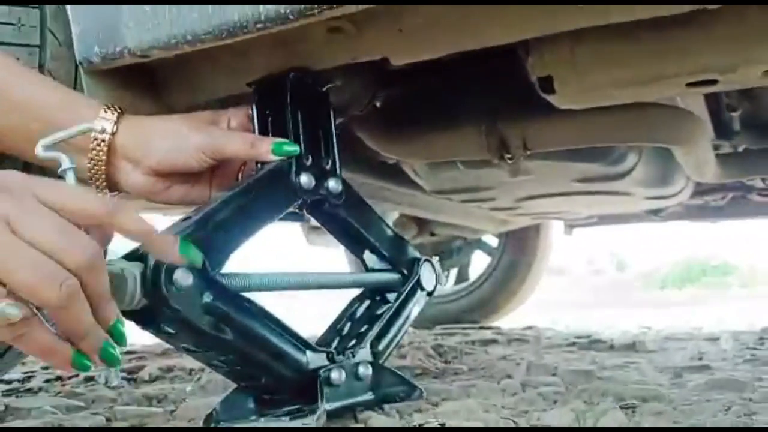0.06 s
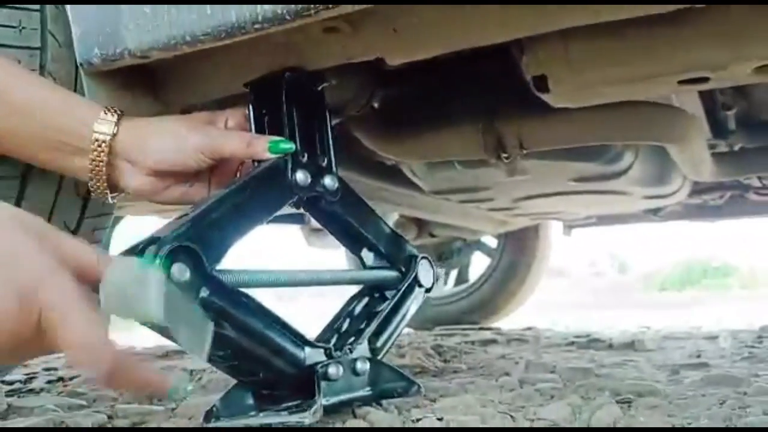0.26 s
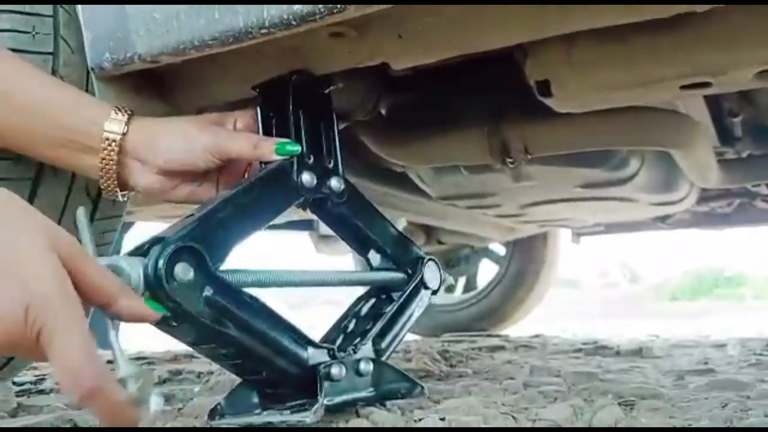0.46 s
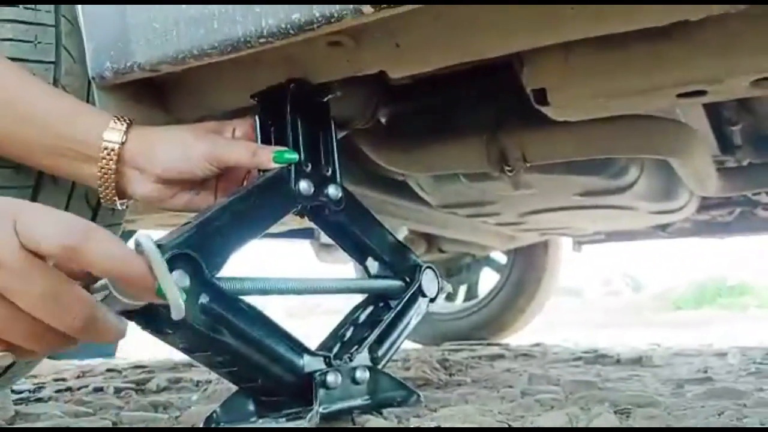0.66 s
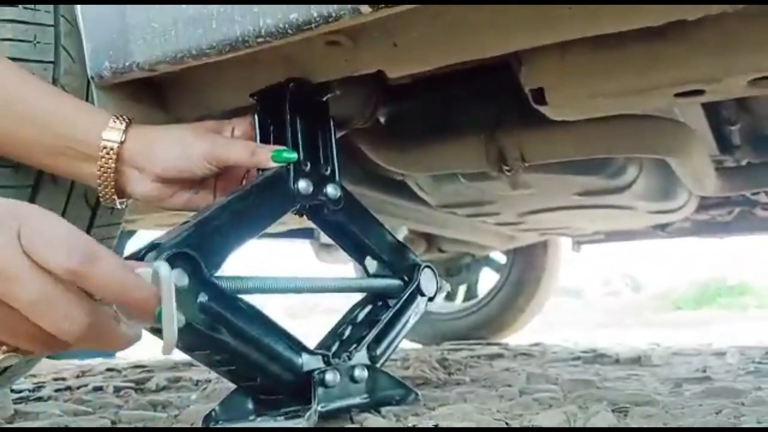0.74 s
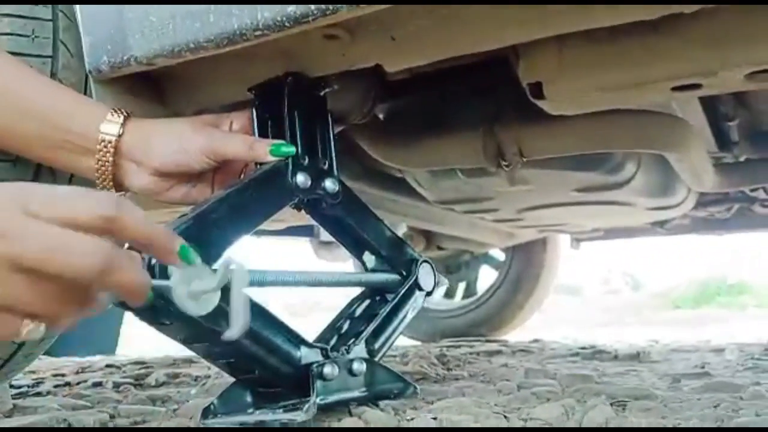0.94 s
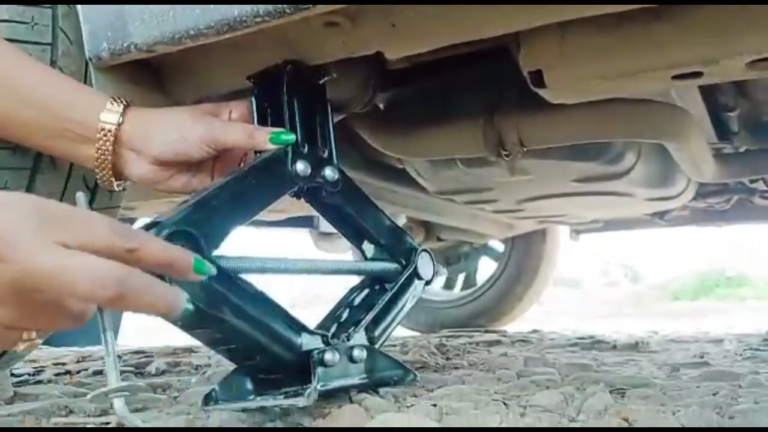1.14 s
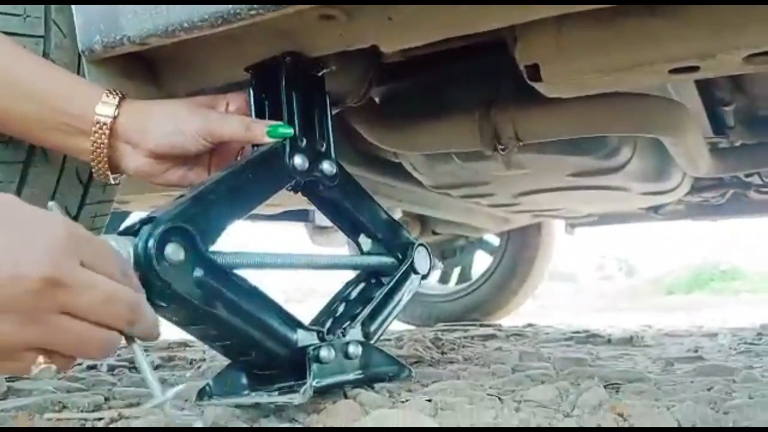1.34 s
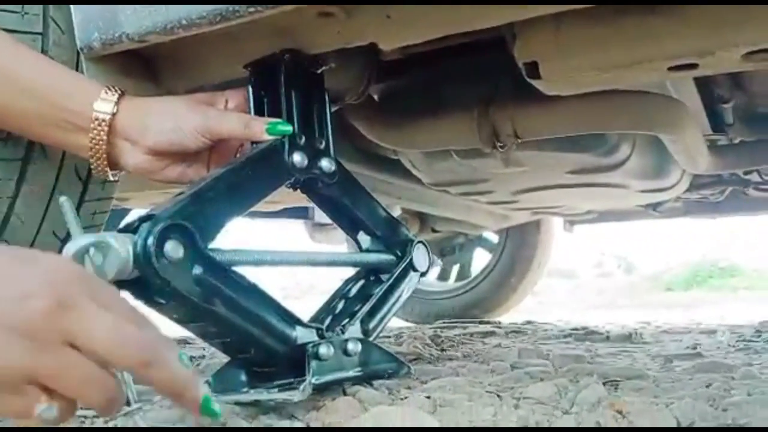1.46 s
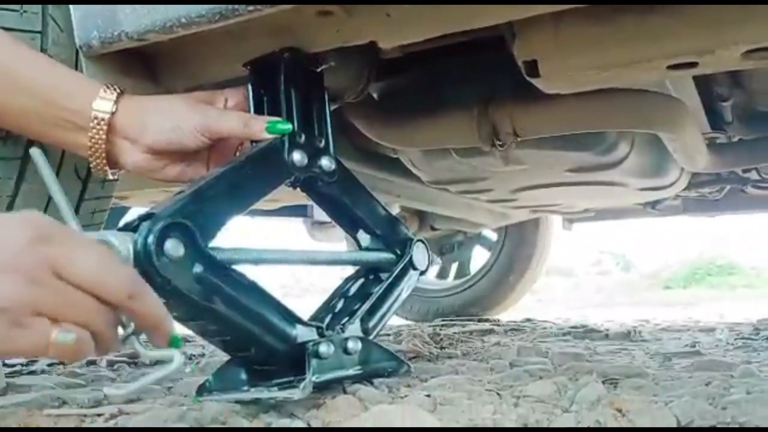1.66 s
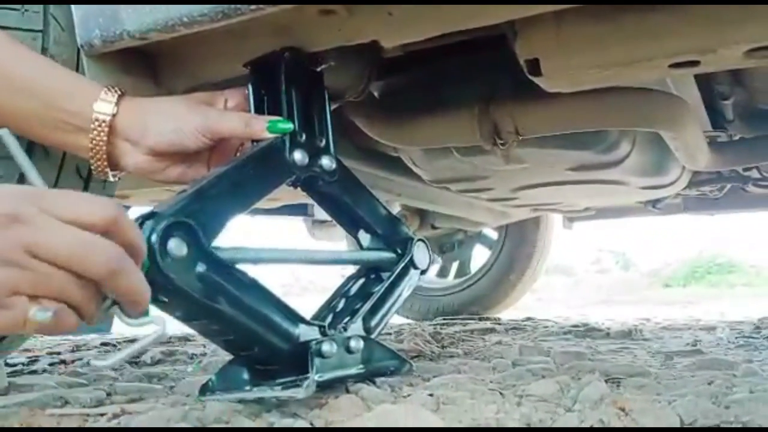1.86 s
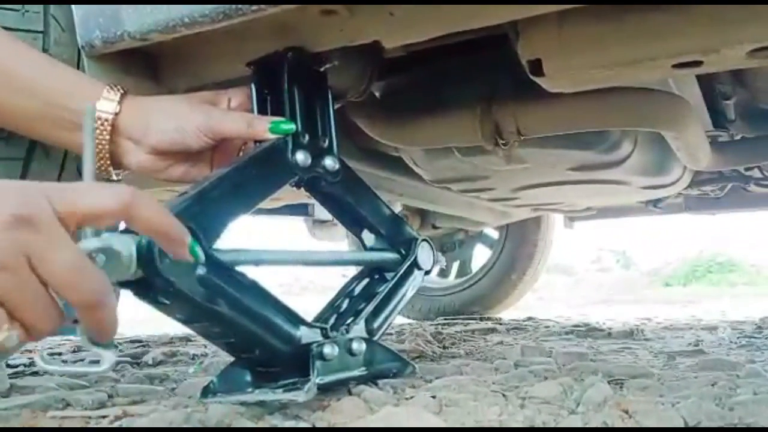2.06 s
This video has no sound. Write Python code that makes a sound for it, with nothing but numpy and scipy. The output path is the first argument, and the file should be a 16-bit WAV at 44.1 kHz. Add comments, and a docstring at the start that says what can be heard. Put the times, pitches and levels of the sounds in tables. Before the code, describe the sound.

Close metal clinks and scrapes from a hand winding a scissor jack under a car.

```python
"""Winding a scissor jack

Outdoors, close to the microphone, a hand winds the loose steel crank of a scissor jack under a car.
On each turn the crank knocks and scrapes in the eye of the screw and the pressed-steel frame clanks.
The load settles with snaps and a groan; the rod squeaks and rings thinly until the fingers damp it.
Some way off an engine idles, over low rumble, thin hiss and a faint whine."""
import sys
import numpy as np
from scipy import signal
from scipy.fft import rfft, irfft
from scipy.io import wavfile

SR = 44100
rng = np.random.default_rng(int(sys.argv[2]) if len(sys.argv) > 2 else 0)


def materialize(psi):
    """Save the field psi as 16-bit PCM at rate SR to the path in sys.argv[1].

    A 1-D psi becomes a single channel; in a 2-D psi each row is a channel.
    """
    bounded = np.clip(np.atleast_2d(psi).T, -1, 1)
    quanta = np.round(bounded * 32767).astype(np.int16)
    wavfile.write(sys.argv[1], SR, quanta)


N = 92610
TIME = np.arange(N) / SR


def from_db(db):
    """Decibels to gain."""
    return 10 ** (np.asarray(db) / 20)


def unit_rms(x):
    """Scale to unit power."""
    return x / np.sqrt(np.mean(x ** 2) + 1e-20)


def fade(t, t60):
    """Exponential decay from t = 0, flat before."""
    return np.exp(-np.log(1000) * np.maximum(t, 0) / t60)


def butter(x, hz, kind, order=2):
    """Causal low- or high-pass."""
    return signal.sosfilt(signal.butter(order, hz, kind, fs=SR, output="sos"), x)


def colour(x, hz, db):
    """Shape a spectrum with a curve drawn on a log-frequency axis."""
    f = np.maximum(np.fft.rfftfreq(x.shape[-1], 1 / SR), 1)
    return irfft(rfft(x) * from_db(np.interp(np.log(f), np.log(hz), db)), x.shape[-1])


def drift(hz):
    """Slow random wander of unit power."""
    return unit_rms(butter(rng.standard_normal(N + SR), hz, "low")[SR:])


def pan(db):
    """Left and right gains, db being left minus right."""
    return from_db(np.array([[db], [-db]]) / 2)


def add(out, start, x):
    """Mix a sound in at a time in seconds."""
    i = int(start * SR)
    out[:, i:i + x.shape[-1]] += x[:, :N - i]


# Spectrum of the open air around the microphone: f/Hz, relative level/dB
AIR_SPECTRUM = [(15, -22.5), (25, -3), (95, -1), (621, -24), (769, -29), (1280, -30.5), (4150, -32),
                (6200, -45.5), (15000, -43.5)]
# Background hiss dips during the loud clanks and comes back at the end,
# as with a recorder's gain control: t/s, gain/dB
HISS_GAIN = [(.1, 4.5), (.55, -1.5), (2.02, 2.5)]


def open_air(level_db=-47, split_hz=894, side_db=-8.5):
    """Steady low rumble and a thin background hiss, wider in the treble."""
    mid, side = colour(rng.standard_normal((2, N)), *np.transpose(AIR_SPECTRUM))
    side = from_db(side_db) * side + 0.6 * butter(side, split_hz, "high", order=1)
    air = from_db(level_db) * unit_rms(np.array([mid + side, mid - side]))
    rumble = butter(air, split_hz, "low", order=1)
    hiss = (air - rumble) * from_db(np.interp(TIME, *np.transpose(HISS_GAIN)))
    return rumble + hiss


# A faint whine in the far distance: t/s, f/Hz, level/dB
WHINE_PATH = [(1.68, 804, -76), (1.849, 798, -58.5), (2.1, 765, -57.5)]


def distant_whine(width_hz=28):
    """A narrow band of noise comes in late and sinks a little in pitch."""
    times, hz, db = np.transpose(WHINE_PATH)
    phase = 2 * np.pi * np.cumsum(np.interp(TIME, times, hz)) / SR
    band = drift(width_hz) * np.sin(phase) + drift(width_hz) * np.cos(phase)
    return band * from_db(np.interp(TIME, times, db)) * (TIME > times[0])


# The engine some way off, centre: t/s, level of the lowest two hum lines/dB, of the upper lines/dB
IDLE_LEVELS = [(0, -35, -41.5), (.35, -46, -48.5), (.8, -38, -38), (1.15, -37.5, -36.5), (1.4, -48, -52),
               (2.1, -71, -47.5)]
# Its hum lines: f/Hz, relative level/dB
HUM_LINES = [(67.7, -7.5), (101.7, -7), (135.3, -5.5), (203.5, -11)]


def idling_engine(gain_db=-5, waver_db=2.5):
    """Multiples of the crankshaft rate hum, each wavering in level and phase."""
    times, low_db, upper_db = np.transpose(IDLE_LEVELS)
    hum = np.zeros(N)
    for k, (hz, db) in enumerate(HUM_LINES):
        level_db = db + gain_db + np.interp(TIME, times, low_db if k < 2 else upper_db)
        level_db += waver_db * drift(hz=7.8)
        phase = 2 * np.pi * (hz * TIME + rng.random()) + 0.78 * drift(hz=4.7)
        hum += from_db(level_db) * np.sin(phase)
    return np.sqrt(2) * hum


def joint_groan(start_s=0.6796, length_s=0.031, start_hz=814, rise_hz_per_s=3550, level_db=-30):
    """A joint of the jack gives one short rising creak under load."""
    out = np.zeros((2, N))
    t = TIME[:int(length_s * SR)]
    swell = np.sin(np.pi * t / length_s)
    glide = np.sin(2 * np.pi * (start_hz + rise_hz_per_s * t / 2) * t)
    add(out, start_s, from_db(level_db) * pan(0) * swell * glide)
    return out


# Snaps close by, right of the microphone: t/s, level/dB, t60/s
LOAD_SNAPS = [(0.2328, -13, 0.046), (0.2731, -26, 0.0074), (0.307, -42.5, .05)]
# Their spectrum: f/Hz, relative level/dB
SNAP_SPECTRUM = [(250, -20.5), (1300, -11.5), (2500, 1), (13000, -21.5)]


def load_snaps(pan_db=-12):
    """The load settles with dry cracks that die at once."""
    out = np.zeros((2, N))
    for start, db, t60 in LOAD_SNAPS:
        crack = unit_rms(colour(rng.standard_normal(N), *np.transpose(SNAP_SPECTRUM)))
        add(out, start, from_db(db) * pan(pan_db) * crack * fade(TIME, t60))
    return out


# The rod rubbing, close and to the left: t/s, length/s, f/Hz, relative level/dB
ROD_SQUEAKS = [(.233, .023, 11425, -14), (.241, .015, 11635, -29), (.241, .015, 7530, -35),
               (.415, .03, 12070, -34), (.434, .012, 11010, -20), (.435, .018, 8030, -34),
               (.83, .025, 8030, -37), (1.183, .035, 12070, -34), (1.2, .018, 7770, -33)]


def rod_squeaks(gain_db=-1.5, pan_db=6.5, rise_s=0.001, t60_s=0.054):
    """Friction locks on one mode of the rod, holds it briefly and lets it die."""
    out = np.zeros((2, N))
    for start, length, hz, db in ROD_SQUEAKS:
        envelope = np.minimum(TIME / rise_s, 1) * fade(TIME - length, t60_s)
        add(out, start, from_db(db + gain_db) * pan(pan_db) * envelope * np.sin(2 * np.pi * hz * TIME))
    return out


# Modes of the steel rod: f/Hz, relative level/dB, t60/s
ROD_MODES = [(7750, -17, .6), (11438, -3, .55), (11646, 0, .75), (12352, -14, .7)]
# Its free rings, close and well to the left: start t/s, damped at t/s, level/dB
ROD_RINGS = [(0.431, 0.681, -33.5), (1.189, 1.415, -35.5)]


def rod_rings(shimmer_db=2.5, shimmer_hz=14, damped_t60_s=0.019, pan_db=11.5):
    """The rod rings until the fingers stop it; as the crank turns, each mode wavers on its own."""
    ring = np.zeros(N)
    for hz, db, t60 in ROD_MODES:
        envelope = from_db(db + shimmer_db * drift(shimmer_hz)) * fade(TIME, t60)
        ring += envelope * np.sin(2 * np.pi * hz * TIME)
    out = np.zeros((2, N))
    for start, damped_at, db in ROD_RINGS:
        fingers = fade(TIME - (damped_at - start), damped_t60_s)
        add(out, start, from_db(db) * pan(pan_db) * ring * fingers)
    return out


# The crank's place in front of the microphone: t/s, left minus right level/dB
CRANK_BALANCE = [(.24, 2), (.39, 0)]


def crank_pan(at_s):
    """Left and right gains of a contact: slightly left at first, then centre."""
    return pan(np.interp(at_s, *np.transpose(CRANK_BALANCE)))


CONTACT_RISE_S = 0.0049
# Clunks of the loaded jack, close up: t/s, f/Hz, level/dB, t60/s
JACK_CLUNKS = [(.438, 2750, -24, .08), (.528, 1480, -31, .09), (1.62, 2890, -11, .06),
               (1.815, 2845, -7, .04), (1.813, 2520, -12, .035)]


def jack_clunks():
    """Each hard shift of the load rings a single mode of the jack."""
    out = np.zeros((2, N))
    for start, hz, db, t60 in JACK_CLUNKS:
        envelope = (1 - fade(TIME, CONTACT_RISE_S)) * fade(TIME, t60)
        add(out, start, from_db(db) * crank_pan(start) * envelope * np.sin(2 * np.pi * hz * TIME))
    return out


FRAME_T60_S, TREBLE_HZ, STEREO_CORRELATION = 0.045, 4910, 0.62
CRACK_DB, CRACK_T60_S = -1, 0.0061
UNDERBODY_DB, UNDERBODY_T60_S = -32, 0.24
# Crowded modes of the pressed-steel frame at the microphone: f/Hz, left level/dB, right level/dB
FRAME_SPECTRUM = [(612.5, -42, -35.5), (832, -12, -10.5), (1138, -14.5, -10), (1474, -7, 2), (2350, -1, 4),
                  (3020, -1, 0.5), (3210, -7.5, -14.5), (4870, -12.5, -8), (6200, -6.5, -24.5),
                  (7300, -14, -30), (7800, -7.5, -26.5), (9220, -20.5, -35), (9190, -13.5, -24.5),
                  (11900, -18, -26), (14470, -32, -58.5), (15440, -57, -78)]
# Its clearest modes, a little to the right: f/Hz, relative level/dB, t60/s
CLEAR_MODES = [(520, -20, .08), (1440, -15, .13), (1580, -9, .14), (1677, -6, .14), (1857, -11, .12),
               (2372, -6, .11), (2575, -5, .08), (2885, -4, .08)]


def frame_response(treble_db, ripple_db=4, modes_db=-11, modes_pan_db=-5.5):
    """The struck frame: a short crash of crowded modes, a few longer ones, reflections under the car."""
    t = TIME[:SR // 4]
    hz, left_db, right_db = np.transpose(FRAME_SPECTRUM)
    shared, separate = rng.standard_normal(len(t)), rng.standard_normal((2, len(t)))
    left, right = np.sqrt(STEREO_CORRELATION) * shared + np.sqrt(1 - STEREO_CORRELATION) * separate
    crash = np.array([colour(left, hz, left_db), colour(right, hz, right_db)])
    # each contact point favours some modes over others
    ripple_hz = np.geomspace(hz[0], hz[-1], 64)
    crash = unit_rms(colour(crash, ripple_hz, ripple_db * rng.standard_normal(len(ripple_hz))))
    crash = colour(crash, [TREBLE_HZ / 2, TREBLE_HZ * 1.75], [0, treble_db])
    modes = np.zeros(len(t))
    for mode_hz, db, t60 in CLEAR_MODES:
        strength = from_db(modes_db + db + rng.normal(0, 3.0))
        modes += strength * fade(t, t60) * np.sin(2 * np.pi * (mode_hz * t + rng.random()))
    crack = from_db(CRACK_DB) * fade(t, CRACK_T60_S)
    reflections = from_db(UNDERBODY_DB) * fade(t, UNDERBODY_T60_S)
    decay = crack + fade(t, FRAME_T60_S) + reflections
    return (crash * decay + pan(modes_pan_db) * modes) * (1 - fade(t, CONTACT_RISE_S))


# Crank scrapes, close up: t/s, length/s, relative level/dB, change over the stroke/dB, treble/dB
CRANK_SCRAPES = [(0.186, 0.072, -44.5, 12, 3), (0.387, 0.048, -29, 1, 0), (0.429, 0.038, -24.5, -6.5, 8),
                 (0.461, 0.11, -35.5, -23.5, -26), (0.681, 0.043, -24, -4, -2.5),
                 (0.736, 0.039, -23, -4.5, -14), (.809, 0.062, -28.5, 5, -1), (0.882, 0.048, -35, -5.5, 1),
                 (0.946, 0.1, -34, -15.5, -6), (1.156, 0.023, -32.5, 16.5, -1), (1.184, .05, -19, -2.5, 0),
                 (1.548, 0.054, -28.5, 3, -11), (1.605, 0.022, -18.5, -1, 2),
                 (1.631, 0.048, -17.5, -6.5, -6.5), (1.675, 0.035, -19, -25, -15)]


def crank_scrapes(gain_db=1, slips_per_s=900, spread_db=0.5, rise_s=0.012, low_cut_hz=210):
    """Steel drags over steel: runs of tiny, uneven slips shake the frame."""
    out = np.zeros((2, N))
    longest = SR // 4
    decay_energy = SR * FRAME_T60_S / (2 * np.log(1000))
    for start, length, db, change_db, treble_db in CRANK_SCRAPES:
        n = int(length * SR)
        slipping = rng.random(longest) < slips_per_s / SR
        sizes = from_db(spread_db * rng.standard_normal(longest))
        slips = (slipping * sizes * rng.choice([-1, 1], longest))[:n]
        slips[0] = 1
        stroke = from_db(db + gain_db + np.linspace(0, change_db, n)) * (1 - fade(TIME[:n], rise_s))
        force = unit_rms(slips) * stroke / np.sqrt(decay_energy)
        scrape = signal.fftconvolve(frame_response(treble_db), force[None], axes=1)
        add(out, start, crank_pan(start) * scrape)
    return butter(out, low_cut_hz, "high")


# Crank knocks, close up: t/s, relative level/dB, treble/dB
CRANK_KNOCKS = [(0.366, -32.5, -2), (.528, -31, 1), (0.731, -38, 21), (0.742, -37.5, 18.5), (.875, -28, 3),
                (0.899, -35, 13.5), (0.959, -23.5, 1), (0.98, -22, -32), (1.141, -31.5, -15),
                (1.180, -18.5, 6), (1.201, -14, 5), (1.2189, -10, 2), (1.3, -20.5, -2.5), (1.453, -21, -1),
                (1.456, -16.5, -4.5), (1.478, -19, -3), (1.484, -16.5, 0), (1.523, -23, 3),
                (1.548, -18.5, -0.5), (1.605, -25, 4), (1.622, -14.5, 3.5), (1.648, -15.5, 1.5),
                (1.657, -16, -12), (1.667, -17.5, 0), (1.81, -21, 5), (1.817, -17.5, 0)]


def crank_knocks(gain_db=1, low_cut_hz=960):
    """The loose crank strikes the eye of the screw and the frame clanks, thinner than in a scrape."""
    out = np.zeros((2, N))
    for start, db, treble_db in CRANK_KNOCKS:
        add(out, start, from_db(db + gain_db) * crank_pan(start) * frame_response(treble_db))
    return butter(out, low_cut_hz, "high")


def scene(left_lead_s=0.00026):
    """The jack up close, reaching the left side of the microphone first, with the outdoors behind."""
    crank = crank_knocks() + crank_scrapes()
    left, right = crank + load_snaps() + rod_squeaks() + rod_rings() + jack_clunks() + joint_groan()
    jack = np.array([left, np.roll(right, round(left_lead_s * SR))])
    return jack + idling_engine() + open_air() + distant_whine()


def record(dry):
    """Peaks clip at full scale, then a steep low-pass cuts the highest treble."""
    stop_db, stop_hz = 70, 16800
    low_pass = signal.cheby2(12, stop_db, stop_hz, fs=SR, output="sos")
    return signal.sosfilt(low_pass, np.clip(dry, -1, 1))


dry = scene()
out = record(dry)
materialize(out)
```